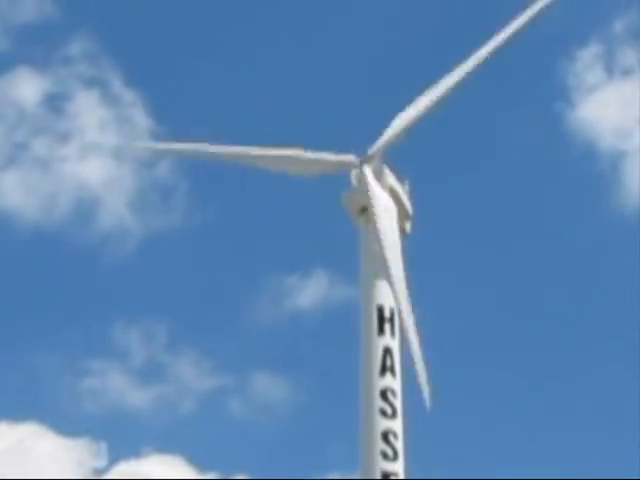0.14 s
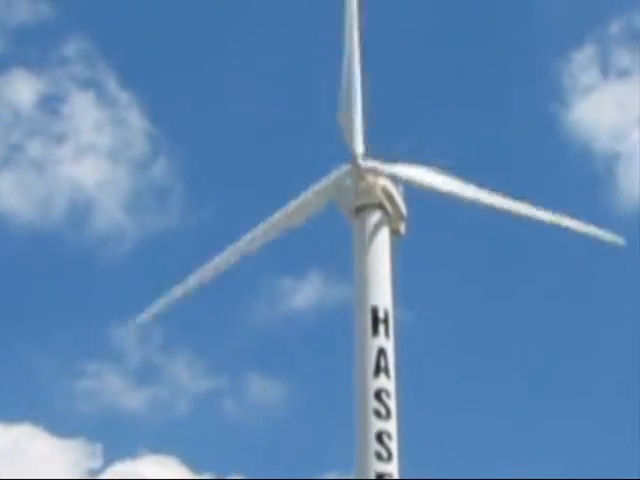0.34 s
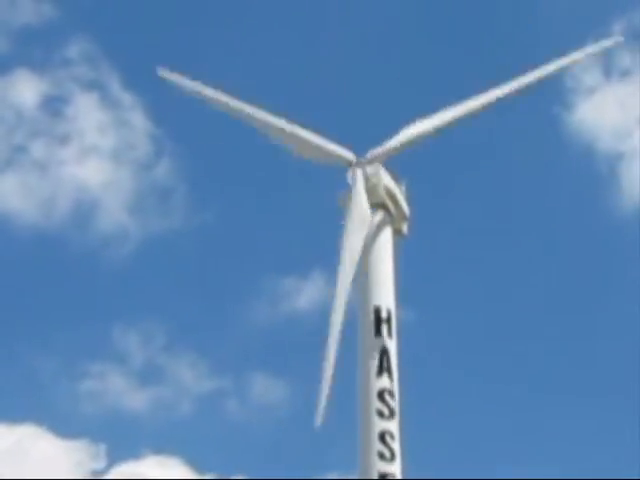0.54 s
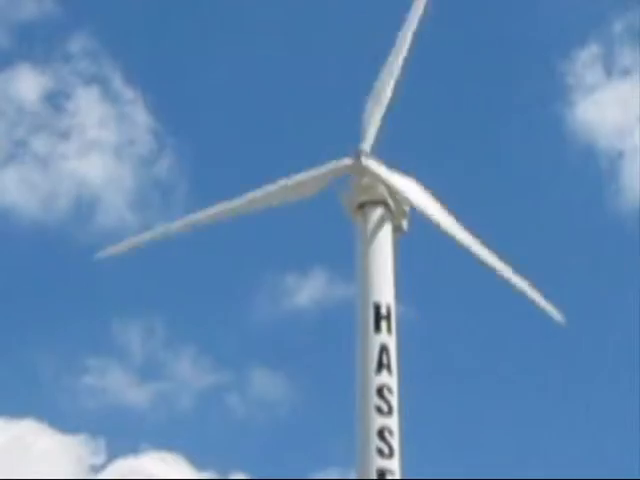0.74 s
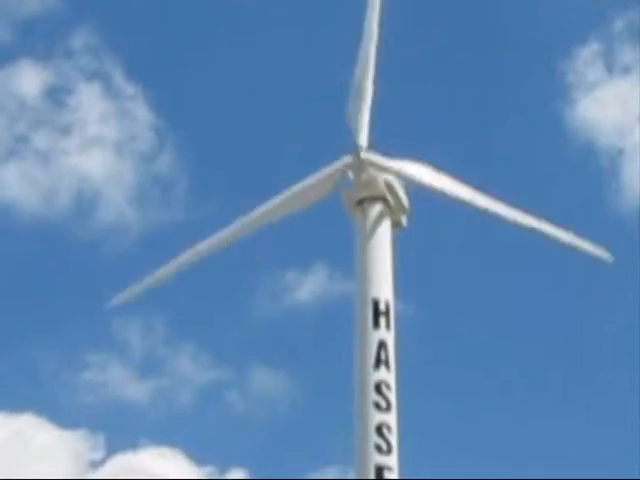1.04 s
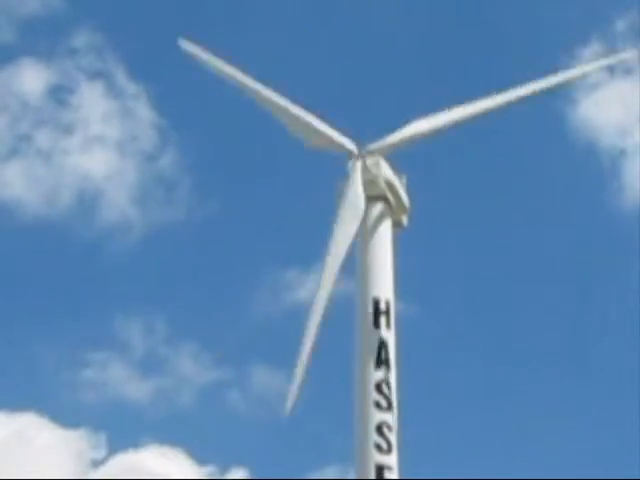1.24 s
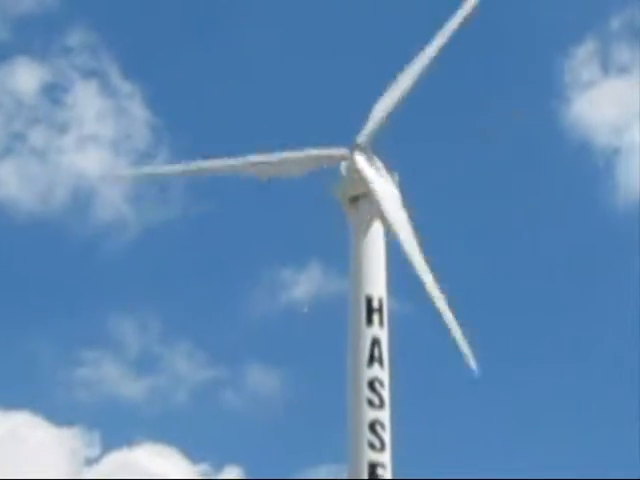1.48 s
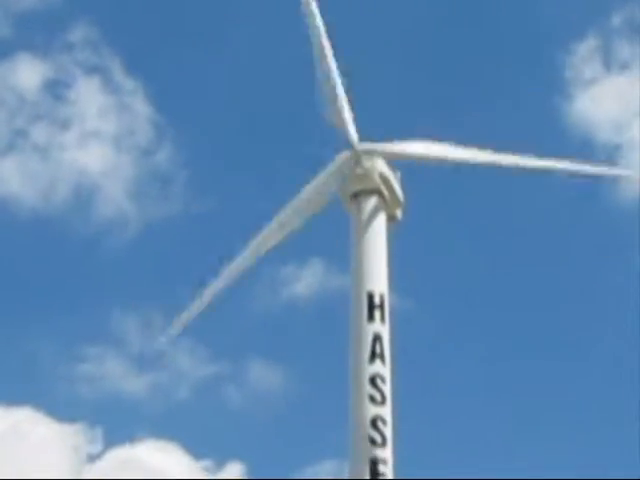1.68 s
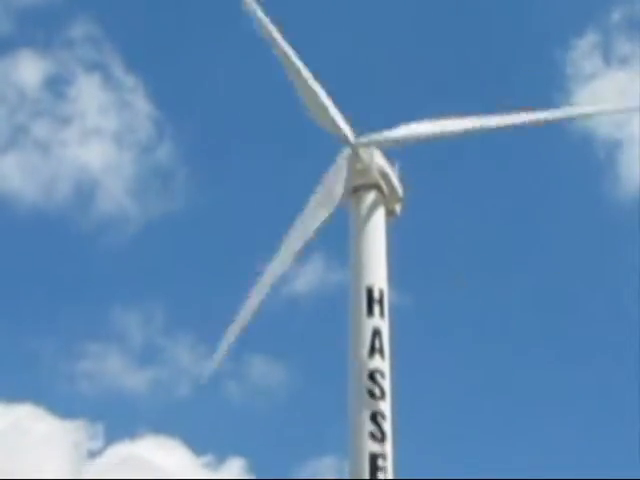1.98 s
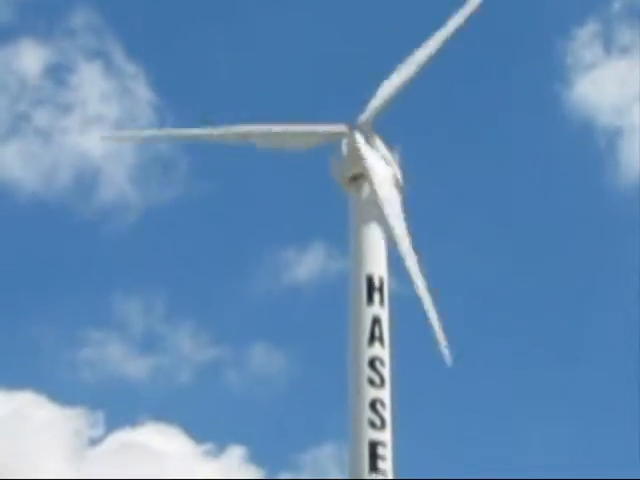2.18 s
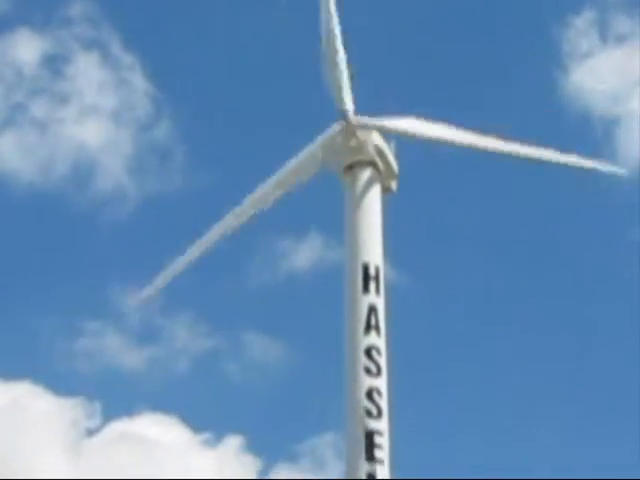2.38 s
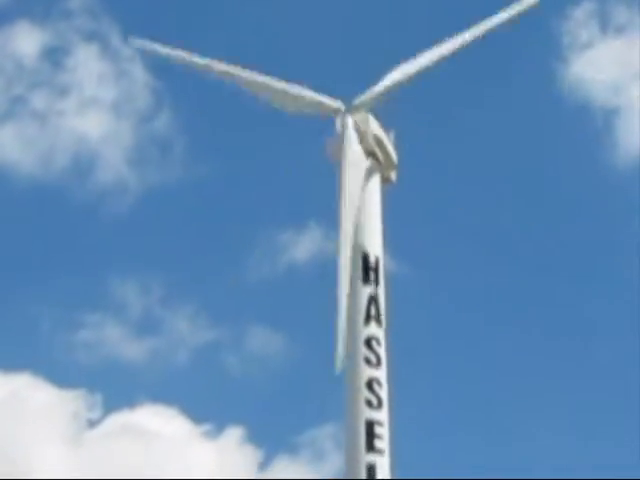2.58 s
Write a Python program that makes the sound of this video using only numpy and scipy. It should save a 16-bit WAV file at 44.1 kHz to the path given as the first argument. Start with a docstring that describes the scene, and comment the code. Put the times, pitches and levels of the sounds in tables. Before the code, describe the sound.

Wind buffets a small microphone outdoors in a lumpy low rumble, with soft thuds and faint turbine blade swishes behind; from about two seconds a gust brings brighter flutter and rapid slaps.

```python
"""Wind buffeting below a wind turbine

Turbulence at a small microphone makes a lumpy rumble: noise whose spectrum brightens with the flow force.
As a gust builds near the end it turns into a brighter flutter with slaps, which are push-pull pulses.
Behind it, swelling coloured noise makes faint blade swishes, over steady airy noise and a whine of sines.
The recorder limits the peaks and mirrors the low sound as a thin high fizz."""
import sys
import numpy as np
from scipy import signal
from scipy.fft import rfft
from scipy.io import wavfile
from scipy.ndimage import uniform_filter1d

SR = 44100
rng = np.random.default_rng(int(sys.argv[2]) if len(sys.argv) > 2 else 0)


def bounce(signal):
    """Save signal as a 16-bit WAV file at the path given by the first command-line argument."""
    frames = np.transpose(np.atleast_2d(signal))
    limited = np.clip(frames, -1, 1)
    pcm = np.round(limited * 32767).astype(np.int16)
    wavfile.write(sys.argv[1], SR, pcm)


N = 119952

# force of the flow, which brightens the rumble: time_s, force_db (about the gain at 1 kHz)
FLOW_FORCE = [(0, 1.5), (.3, -1.5), (.6, -1.5), (.85, -1), (1.4, 1), (1.85, -4), (2.15, 3.5), (2.33, 2.5),
              (2.46, 8.5), (2.56, 7.5), (2.65, 11.5), (2.72, 13)]


def amp(db):
    """Level as a logarithm: decibels to an amplitude gain."""
    return 10 ** (np.asarray(db) / 20)


def unit(x):
    """Normalisation: scales to rms 1."""
    return x / np.sqrt(np.mean(x ** 2) + 1e-20)


def read(points, hz):
    """Interpolation on a log-frequency axis, as pitch is heard."""
    f, value = np.transpose(points)
    return np.interp(np.log(hz + 1), np.log(f + 1), value)


def curve(points):
    """Linear interpolation of a control curve at every sample."""
    return np.interp(np.arange(N) / SR, *np.transpose(points))


def wander(rate_hz):
    """Low-passed noise: random motion of rms 1, from 2 Hz up to about the given rate."""
    hz = np.fft.rfftfreq(N, 1 / SR)
    response = (hz > 2) / (1 + (hz / rate_hz) ** 4)
    return unit(np.fft.irfft(rfft(rng.standard_normal(N)) * response, N))


def noise(colour):
    """Spectral shaping: white noise filtered to a colour, at rms 1."""
    hz = np.fft.rfftfreq(N, 1 / SR)
    response = amp(read(colour, hz)) * hz / (hz + 2)
    return unit(np.fft.irfft(rfft(rng.standard_normal(N)) * response, N))


def bands(x, count=16):
    """Filter bank: splits a sound into overlapping (centre_hz, band) pairs that sum to the whole."""
    hz = np.fft.rfftfreq(N, 1 / SR)
    spectrum = rfft(x)
    centres = np.geomspace(60, 12000, count)
    return [(centre, np.fft.irfft(spectrum * np.interp(hz, centres, weights), N))
            for centre, weights in zip(centres, np.eye(count))]


def steadied(x):
    """Envelope compression: evens out a share of the slow chance swells in a noise."""
    share, window_s = 0.63, 0.044
    power = uniform_filter1d(x ** 2, size=int(window_s * SR))
    return unit(x / (abs(power) + 1e-9) ** (share / 2))


def buffeting():
    """Turbulent pressure: a rise in flow force lifts the upper bands most, so each quick eddy brightens."""
    # overall rumble level, before the force acts: time_s, level_db
    rumble_level = [(0.0, -65.5), (0.11, -60.5), (0.15, -54.5), (0.45, -43.5), (0.47, -51), (0.63, -38.5),
                    (0.66, -47), (0.68, -41), (0.72, -48.5), (1.02, -43), (1.04, -48), (1.09, -43),
                    (1.11, -51.5), (1.17, -36.5), (1.22, -57), (1.26, -43.5), (1.45, -46.5), (1.48, -55),
                    (1.5, -44.5), (1.73, -43.5), (1.76, -47.5), (1.82, -41.5), (2.01, -48), (2.04, -40),
                    (2.15, -53.5), (2.18, -46), (2.26, -47.5), (2.31, -40), (2.34, -49), (2.37, -42.5),
                    (2.53, -45.5), (2.57, -53), (2.61, -45), (2.72, -46)]
    # single buffets: centre_s, half_length_s (to 1/e), added_force_db
    single_buffets = [(0.623, .005, 8.5), (0.671, 0.0042, 7), (0.739, 0.0056, 10.5), (1.39, .006, 8),
                      (1.542, .005, 3), (1.61, 0.033, 5), (2.046, 0.005, 10), (2.068, 0.0057, 11),
                      (2.124, 0.0074, 12), (2.196, .005, 12), (2.446, .005, 8.5), (2.505, 0.008, 11),
                      (2.54, 0.0069, 11.5), (2.61, 0.0039, 10.5), (2.701, 0.011, 9)]
    # spectrum in a moderate flow: frequency_hz, density_db
    buffet_colour = [(30, -31.5), (80, -11), (118, 2), (170, -0.5), (250, -6.5), (500, -19), (1000, -36),
                     (1600, -46), (2500, -63.5), (4000, -73)]
    # how far each pitch follows the force: frequency_hz, share
    follow_share = [(120, 0.017), (300, 0.58), (600, 0.94), (1200, 0.98), (3000, 1.425)]
    # level of the deepest bass: time_s, level_db
    deep_level = [(0.0, -52.5), (0.04, -64), (0.19, -50.5), (0.23, -55), (0.32, -47.5), (0.39, -61),
                  (0.42, -42), (0.66, -55), (0.72, -42.5), (0.75, -53), (0.82, -45), (0.95, -51),
                  (1.17, -44.5), (1.2, -58), (1.26, -47), (1.39, -44.5), (1.43, -43), (1.53, -52),
                  (1.71, -48.5), (1.73, -41), (1.88, -51.5), (1.99, -44), (2.1, -52), (2.27, -45.5),
                  (2.5, -53.5), (2.58, -41), (2.61, -55), (2.72, -54)]
    # spectrum of slow, large eddies: frequency_hz, density_db
    deep_colour = [(15, -26), (28, -10), (42, -7.5), (65, -0.5), (90, -1), (115, -3), (160, -26.5),
                   (400, -66), (2000, -110)]
    eddy_db, eddy_hz = 4.5, 90.5  # quick eddies vary the force; depth before soft limiting
    lump_db, lump_hz = 0.95, 25.2  # slower lumps vary the level
    t = np.arange(N) / SR

    soft_eddies = 2 * np.tanh(wander(eddy_hz) / 2)
    force = curve(FLOW_FORCE) + eddy_db * soft_eddies
    for centre_s, half_s, db in single_buffets:
        force = force + db * np.exp(-((t - centre_s) / half_s) ** 2)

    flow = np.zeros(N)
    for hz, band in bands(steadied(noise(buffet_colour))):
        flow += band * amp(read(follow_share, hz) * force)
    deep = steadied(noise(deep_colour)) * amp(curve(deep_level))
    return deep + flow * amp(curve(rumble_level) + lump_db * wander(lump_hz))


def rush(colour):
    """Broadband flow noise: distant rushing air whose bands drift a little on their own."""
    drift_db, drift_hz = 1, 16
    return sum(band * amp(drift_db * wander(drift_hz)) for _, band in bands(noise(colour)))


def open_air():
    """Stationary flow noise: steady wind over open ground."""
    # spectrum: frequency_hz, density_db
    air_colour = [(100, 9), (500, 1.5), (1200, -3), (2000, -9.5), (3200, -10), (4500, -12.5), (6000, -16),
                  (8000, -17), (9000, -22), (13000, -26.5), (16000, -20)]
    return amp(-66.5) * rush(air_colour)


def turbine():
    """Amplitude modulation: flow noise swells and fades as each blade sweeps by, over a faint machine whine."""
    # blade swishes: top_s, rise_s, fall_s, level_db
    blade_swishes = [(.37, .13, .08, -65), (.505, 0.074, 0.074, -57.5), (.96, 0.21, 0.14, -59.5),
                     (1.39, 0.092, 0.1, -61.5), (1.63, 0.091, 0.16, -62), (1.79, 0.13, 0.075, -61),
                     (2.0, 0.09, 0.058, -62)]
    # air rushing over a blade: frequency_hz, density_db
    swish_colour = [(200, -1), (600, 5), (1000, -1), (1450, -2.5), (2000, -11), (2900, -10.5),
                    (4200, -19.5), (5800, -26.5), (8000, -19), (9200, -22.5), (11000, -43.5), (13000, -26),
                    (16000, -42)]
    # whine of the machinery: pitch_hz, level_db
    whine_tones = [(2298, -94), (2999, -90.5), (8027, -98)]
    t = np.arange(N) / SR

    power = np.zeros(N)  # overlapping swishes add as powers
    for top_s, rise_s, fall_s, db in blade_swishes:
        width_s = np.where(t < top_s, rise_s, fall_s)
        power += amp(db) ** 2 * np.exp(-((t - top_s) / width_s) ** 2)

    whine = np.zeros(N)
    for hz, db in whine_tones:
        pitch_hz = hz + 2 * wander(5.7)
        whine += amp(db) * unit(np.sin(2 * np.pi * np.cumsum(pitch_hz) / SR))
    return np.sqrt(power) * rush(swish_colour) + whine


def vortex(scale_ms, peak_db):
    """Vortex pressure: a small vortex crosses the microphone port as a push, then a pull."""
    u = np.arange(-1200, 1200) / SR * 1000 / scale_ms
    pulse = -np.tanh(u) / np.cosh(np.clip(u / 2, -20, 20)) ** 2
    return amp(peak_db) * pulse / pulse.max()


def add(mix, s, sound):
    """Superposition: mixes in a short sound centred on time s."""
    start = max(round(s * SR) - len(sound) // 2, 0)
    part = mix[start:][:len(sound)]
    part += sound[:len(part)]


def slaps():
    """Impulsive pressure: big vortex slaps, and a random patter of small ones while the force is high."""
    # slaps of air on the port, the longer ones dull thuds: centre_s, scale_ms, peak_db
    big_slaps = [(.6295, .6, -36), (1.094, 1.8, -37), (1.1745, .7, -38), (1.3945, .42, -39),
                 (1.439, 2.0, -36), (1.4995, .55, -40), (2.0468, .235, -32), (2.0667, .24, -44),
                 (2.1155, .35, -42.5), (2.1905, .45, -38), (2.2385, 1.2, -38), (2.2935, .8, -36),
                 (2.3655, .45, -39), (2.4232, .27, -38), (2.4535, .26, -41), (2.4738, .27, -34),
                 (2.4875, .35, -40), (2.5015, .29, -37), (2.5272, .2, -44), (2.5715, .45, -39),
                 (2.59, .22, -43), (2.6155, .38, -37), (2.6445, .26, -41), (2.675, .3, -41),
                 (2.6925, .27, -36)]
    patter_per_s, patter_ms, patter_db = 70, 0.41, -45  # rate at full force; middle length and level
    from_db, full_db = 2.5, 12  # force at which the patter starts and is densest
    out = np.zeros(N)
    for s, scale_ms, db in big_slaps:
        add(out, s, vortex(scale_ms, db))

    strong = np.clip((curve(FLOW_FORCE) - from_db) / (full_db - from_db), 0, 1)
    chance, length, side = rng.random((N, 3)).T
    for i in np.flatnonzero(chance < strong * patter_per_s / SR):
        scale = 2 ** (length[i] - .5)  # longer ones are also louder
        sign = np.sign(side[i] - .5)
        add(out, i / SR, sign * scale * vortex(patter_ms * scale, patter_db))
    return out


def scene():
    """Superposition of near and distant sources; a high-pass microphone response drops the lowest bass."""
    fade_in = amp(curve([(0, -2), (.35, 0)]))  # time_s, level_db
    background = (turbine() + open_air()) * fade_in
    mix = buffeting() + slaps() + background
    bass_cut = signal.butter(2, 25.5, "high", fs=SR)  # Hz
    return signal.lfilter(*bass_cut, mix)[None]


def record(dry):
    """Peak limiting, then modulation that puts mirror images of the low sound in the treble, then a band limit."""
    # pitches around which the low sound is mirrored: carrier_hz
    mirror_hz = [11025, 14950]
    # strength of each mirror image at an offset of 1 kHz: level_db
    mirror_db = [-20.5, -29.5]
    limit_db, recover_db_per_s = -30.5, 297
    mirror_knee_hz, edge_hz = 1620, 15800
    t = np.arange(N) / SR

    # a peak detector that jumps up at once and falls at a steady rate
    fall_db = recover_db_per_s * t
    level_db = 20 * np.log10(abs(dry[0]) + 1e-9)
    peak_db = np.maximum.accumulate(level_db + fall_db) - fall_db
    reduction_db = uniform_filter1d(np.maximum(peak_db - limit_db, 0), size=90)
    x = dry[0] / amp(reduction_db)

    # the slope of the low sound, scaled to unit gain at 1 kHz, modulates each carrier
    low = signal.lfilter(*signal.butter(2, mirror_knee_hz, fs=SR), x)
    slope = np.gradient(low) * SR / (2 * np.pi * 1000)
    x = x + sum(2 * amp(db) * slope * np.cos(2 * np.pi * hz * t) for hz, db in zip(mirror_hz, mirror_db))
    band_limit = signal.firwin(511, edge_hz, window=("kaiser", 9), fs=SR)
    return signal.oaconvolve(x, band_limit, "same")[None]


dry = scene()
out = record(dry)
bounce(out)
```